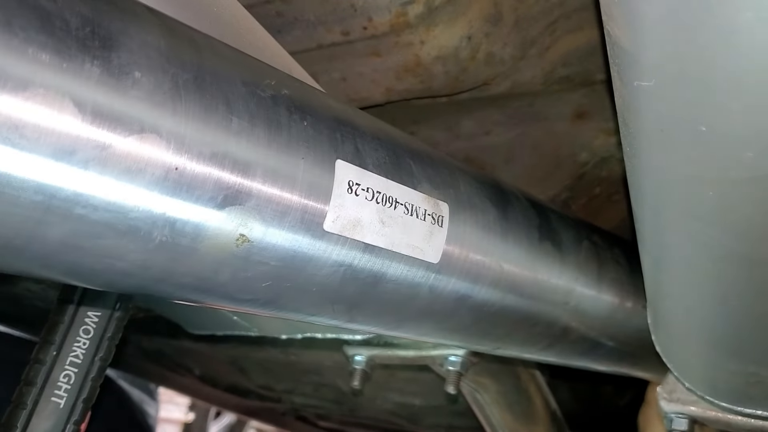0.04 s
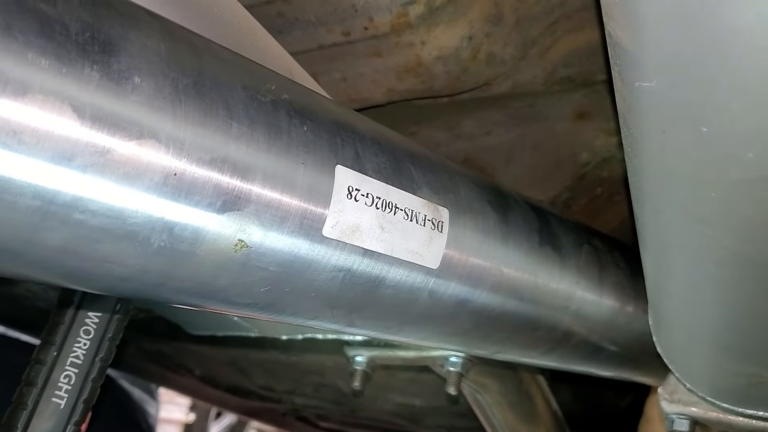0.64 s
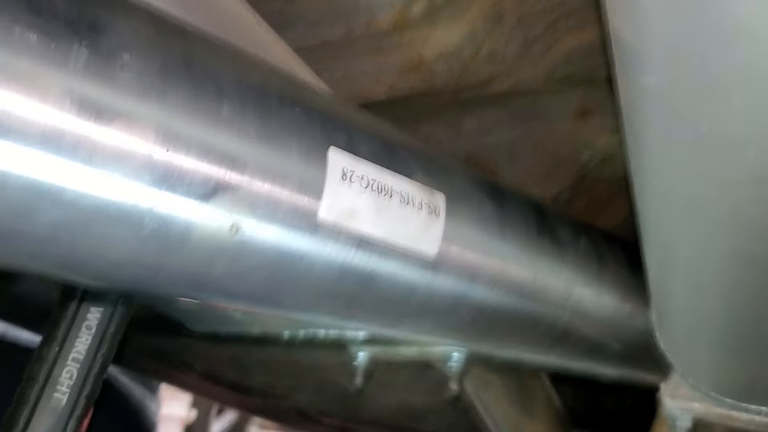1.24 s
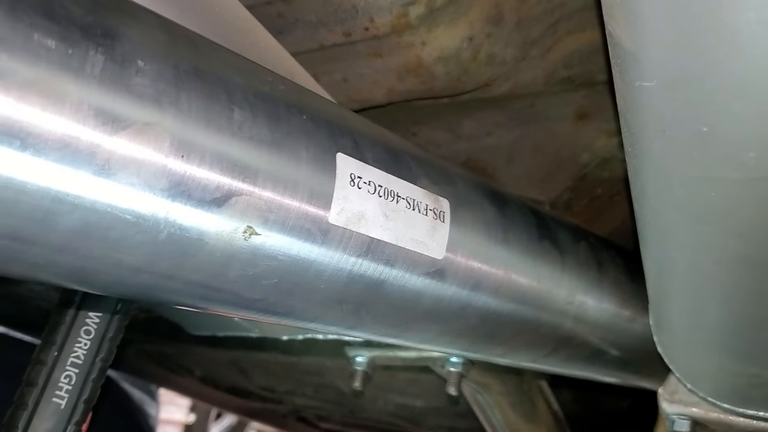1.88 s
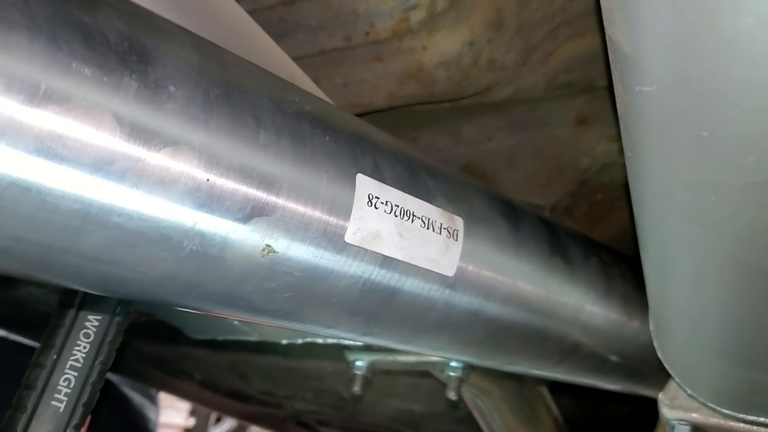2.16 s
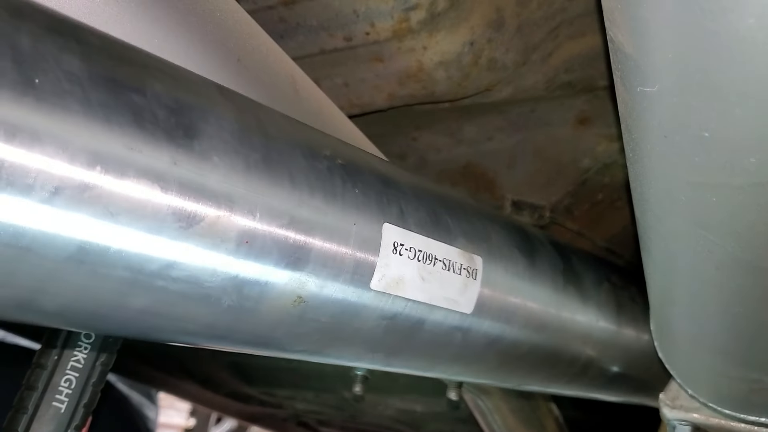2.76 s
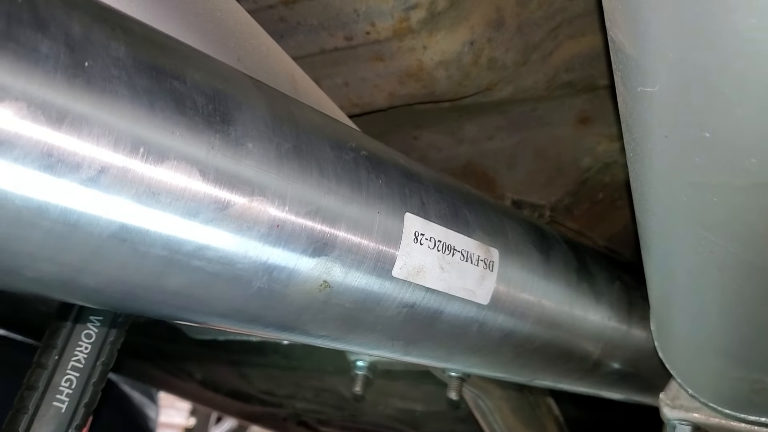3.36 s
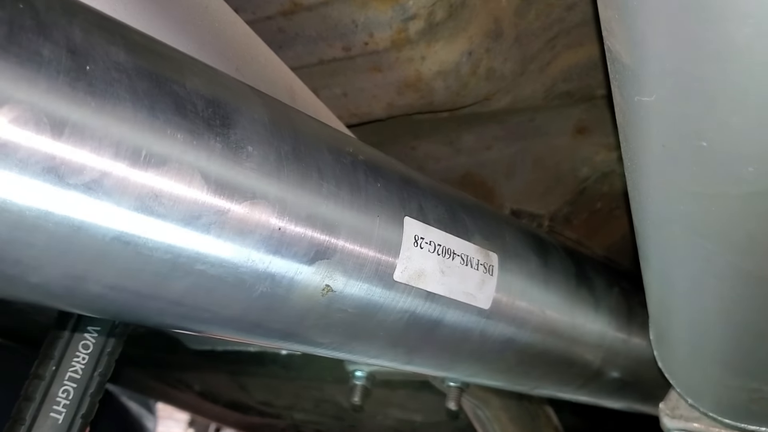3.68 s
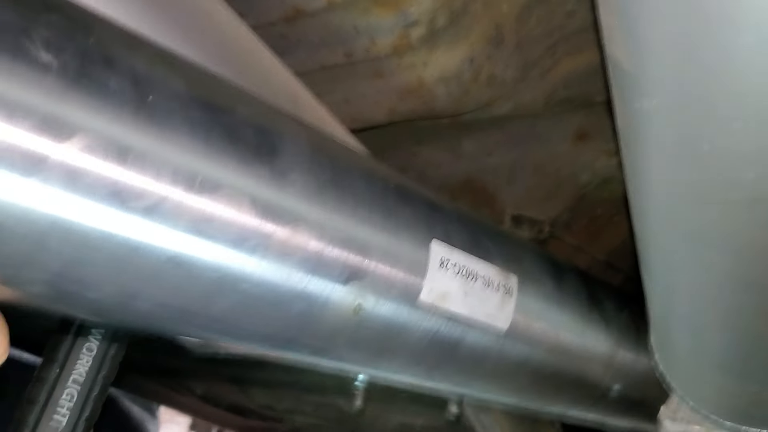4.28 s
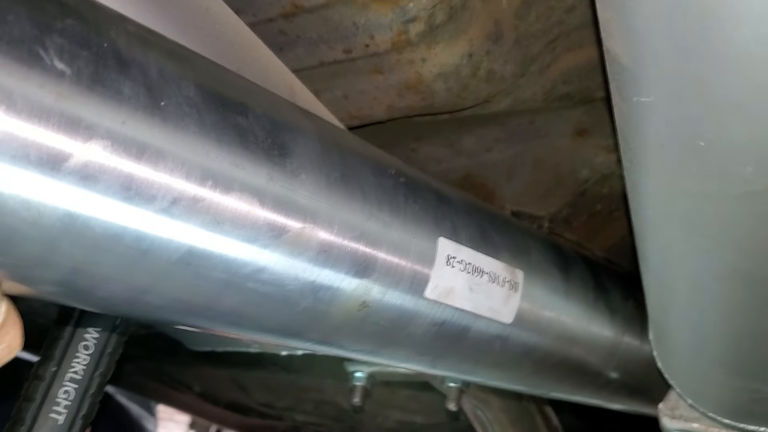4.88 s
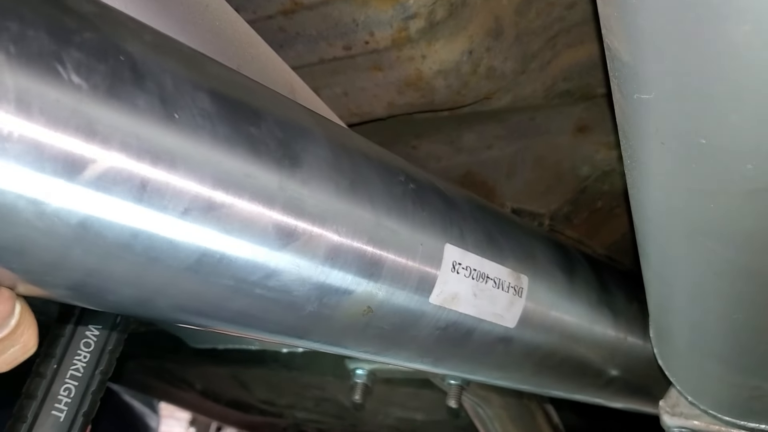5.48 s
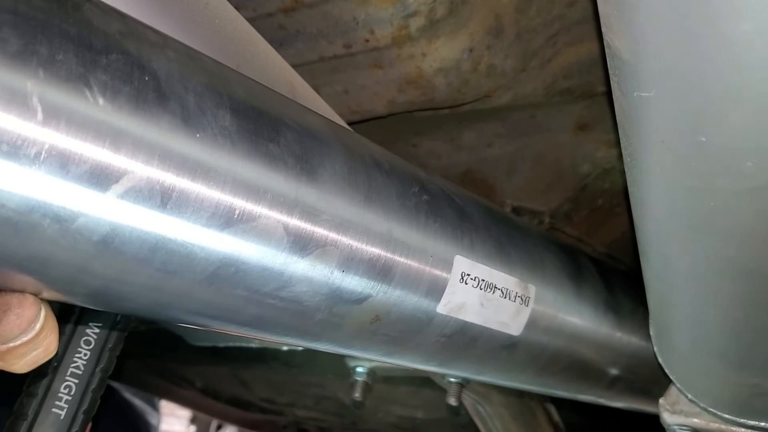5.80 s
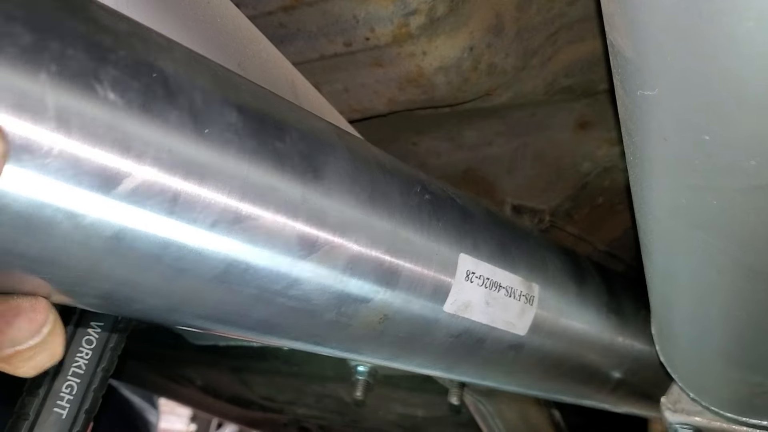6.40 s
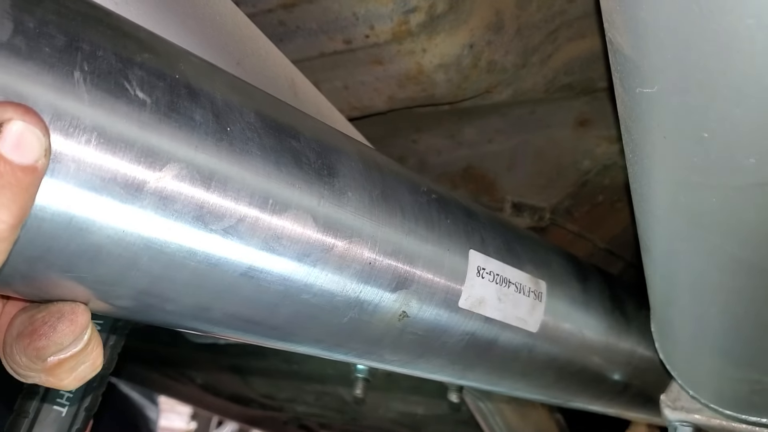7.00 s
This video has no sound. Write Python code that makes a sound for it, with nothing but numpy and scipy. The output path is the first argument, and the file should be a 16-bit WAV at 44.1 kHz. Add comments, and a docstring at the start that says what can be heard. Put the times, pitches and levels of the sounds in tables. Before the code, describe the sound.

Close up under a car in a garage, a hand brushes along a metal driveshaft and turns it back and forth. Dry joints scrape softly, a loose metal part clanks twice, and slack gears close in irregular clunks that briefly ring the tube. A quick cluster of knocks leads to a deep thud from the car body, then a few more clunks and a short squeak. A low hum continues underneath.

```python
"""A low hum in a garage, then a hand brushing along a metal driveshaft and the scrape of its dry joints.
We are under a car, a two-port microphone close to the shaft, while the hand turns it to and fro.
The slack in the gears closes with clunks that shake the underbody and ring the tube.
A loose metal part clanks twice, and three shoves set the car body thudding."""
import sys
import numpy as np
from scipy import signal
from scipy.fft import rfft, irfft
from scipy.io import wavfile

SR = 44100
rng = np.random.default_rng(int(sys.argv[2]) if len(sys.argv) > 2 else 0)


def put_to_file(sound):
    """Save the sound as 16-bit audio at rate SR, in the file named by the first command-line argument."""
    columns = np.atleast_2d(sound).T  # one column per channel
    safe = np.clip(columns, -1, 1)
    whole_steps = np.round(safe * 32767)
    wavfile.write(sys.argv[1], SR, whole_steps.astype(np.int16))


N = 314918


def amp(db):
    """Decibels to gain."""
    return 10 ** (np.asarray(db) / 20)


def unit(x):
    """Scales to rms 1."""
    return x / np.sqrt(np.mean(x ** 2) + 1e-20)


def read(points, hz):
    """Reads a table on a log-frequency axis."""
    f, value = np.transpose(points)
    return np.interp(np.log(hz + 1), np.log(f + 1), value)


def bins(size):
    """Frequencies of a spectrum in Hz."""
    return np.fft.rfftfreq(size, 1 / SR)


def add(mix, s, sound):
    """Mixes a sound in at s seconds."""
    part = mix[:, max(round(s * SR), 0):][:, :sound.shape[1]]
    part += sound[:, :part.shape[1]]


def drift(rate_hz):
    """A smooth random wander of rms 1."""
    return unit(irfft(rfft(rng.standard_normal(N)) * np.exp(-(bins(N) / rate_hz) ** 2), N))


# How alike the two ports hear a noise. Each row: frequency in Hz, correlation.
PORT_LIKENESS = [(60, 1), (300, 0.98), (1000, 0.27), (4000, 0.2), (9000, 0.063), (15000, 0.15)]
def noise(tone_db, size):
    """Coloured noise, partly alike at the two ports."""
    left, other = rfft(rng.standard_normal((2, size)))
    same = np.clip(read(PORT_LIKENESS, bins(size)), 0, 1)
    right = same * left + np.sqrt(1 - same ** 2) * other
    return unit(irfft(np.array([left, right]) * amp(tone_db), size))


# Room tone of the still garage. Each row: frequency in Hz, relative level in dB.
ROOM_TONE = [(20, -18), (40, -7), (62, 0), (100, -3), (160, -18), (340, -22), (500, -31), (1200, -37),
             (2400, -44), (4000, -49), (6800, -53), (7800, -60), (16000, -54)]
# The hum in the room. Each row: frequency in Hz, level in dB about which it wavers.
HUM_TONES = [(58.5, -62.5), (86, -54), (115, -58.5)]
def background(waver_db=3.5, wander_rad=0.37, air_db=-52):
    """Low rumble and a wavering hum fill the garage."""
    t, hum = np.arange(N) / SR, 0
    for hz, db in HUM_TONES:
        peak = amp(db + waver_db * drift(12.0)) * np.sqrt(2)
        hum += peak * np.sin(2 * np.pi * hz * t + wander_rad * drift(6.6))
    return hum + amp(air_db) * noise(read(ROOM_TONE, bins(N)), N)


def strokes(rows, rest_db, drop_db=27, roundness=1.39):
    """Gain of rubbing: a stroke is drop_db down one swell before and one ebb after its fastest moment."""
    t, power = np.arange(N) / SR, amp(rest_db) ** 2
    for s, swell_s, ebb_s, db in rows:
        away = np.maximum((s - t) / swell_s, (t - s) / ebb_s)
        power = power + amp(db - drop_db * np.minimum(away, 10) ** roundness) ** 2
    return np.sqrt(power)


def humps(peaks):
    """Resonance peaks in dB over frequency."""
    return sum(db / (1 + (2 * (bins(N) - hz) / width) ** 2) for hz, width, db in peaks)


# The hiss of the hand, close up. Each row: frequency in Hz, relative level in dB.
HAND_TONE = [(500, 4.5), (1500, -0.5), (3300, 7), (6500, 1), (7600, -9), (9500, -5.5), (12000, -1),
             (15000, 1.5), (16000, -8.5)]
# The tube's resonances under the hand. Each row: centre in Hz, width in Hz, gain in dB.
HAND_PEAKS = [(596, 60, -8.5), (1346, 52, 13), (2978, 130, 8.5), (3360, 27, 7), (5470, 74, -7),
              (5720, 57, 13.5), (6400, 47, 0.5), (6770, 57, 8.5), (8820, 64, 9), (9540, 230, 5.5),
              (9400, 100, 1)]
# Slides of the hand. Each row: fastest moment, swell and ebb in seconds, relative level in dB.
HAND_SLIDES = [(.59, 0.11, 0.13, -61), (.7, 0.096, 0.082, -61.5), (.815, .13, 0.084, -46.5),
               (.96, 0.1, 0.12, -64.5), (1.095, 0.07, 0.13, -55), (1.22, 0.048, 0.13, -65.5),
               (1.445, 0.21, 0.78, -65.5), (1.78, 0.061, 0.06, -64), (2.16, 0.39, .13, -60.5),
               (2.66, 0.078, 0.11, -65.5), (2.78, 0.25, 0.1, -53.5), (3.01, 0.22, 0.15, -58.5),
               (3.29, 0.23, .15, -66), (3.4, 0.36, 0.11, -65), (3.62, 0.3, 0.19, -67),
               (4.29, 0.12, 0.24, -51.5), (4.51, 0.18, 0.13, -58.5), (4.58, 0.11, .15, -60.5),
               (4.69, 0.12, .16, -57), (4.93, 0.077, 0.15, -62), (5.18, 0.11, 0.11, -62.5),
               (5.31, 0.078, 0.11, -62.5), (5.465, 0.04, .09, -65), (5.62, 0.42, 0.22, -64),
               (5.755, .05, 0.081, -67), (5.85, .09, 0.17, -63), (6.26, 0.3, 0.055, -60),
               (6.38, 0.25, 0.1, -53.5), (6.57, 0.26, 0.099, -53), (7.13, 0.18, .1, -61.5)]
def brush(rough_db=1.2, gain_db=4.5):
    """Skin and sleeve slide with a fine, slightly grainy hiss, coloured by the tube."""
    hiss = noise(read(HAND_TONE, bins(N)) + humps(HAND_PEAKS), N)
    return amp(gain_db + rough_db * drift(170)) * strokes(HAND_SLIDES, rest_db=-88.5) * hiss


# Friction in the dry joints. Each row: frequency in Hz, relative level in dB.
JOINT_TONE = [(30, -20), (55, 3), (85, 10.5), (140, -6), (300, -7.5), (460, -3), (680, -9), (950, -12),
              (1560, -13), (1950, -21), (3300, -19.5), (6500, -36.5), (8000, -56.5), (16000, -59.5)]
# The resonances it drives. Each row: centre in Hz, width in Hz, gain in dB.
JOINT_PEAKS = [(480, 48, -3.5), (686, 100, -0.5), (975, 8.1, 18), (1310, 17, 9.5), (1520, 61, 6),
               (1690, 69, 8.5), (2080, 210, 5.5), (2550, 17, 3.5), (3170, 230, 5), (3890, 90, 11.5),
               (5500, 250, 7)]
# Turns of the joints. Each row: fastest moment, swell and ebb in seconds, relative level in dB.
JOINT_TURNS = [(.64, 0.042, 0.074, -64), (.835, 0.073, 0.17, -49.5), (2.0, 0.24, 0.093, -43),
               (2.18, 0.053, 0.088, -45), (2.73, 0.11, 0.054, -35), (2.795, 0.066, 0.094, -33.5),
               (3.0, 0.16, 0.18, -47.5), (3.445, 0.13, 0.091, -49), (3.97, 0.027, 0.04, -59),
               (4.27, .08, 0.056, -41.5), (4.49, 0.3, 0.18, -47.5), (4.7, 0.099, 0.38, -47),
               (4.95, 0.063, 0.054, -28.5), (5.58, 0.1, 0.23, -51.5), (6.55, 0.15, 0.18, -45.5)]
# The tube sings as it binds. Each row: time in seconds, level in dB.
BINDING = [(6.46, -79), (6.5, -61), (6.56, -34), (6.6, -50), (6.64, -104.5)]
def scrapes(rough_db=1.5, gain_db=3.7, creep_db=-75, sing_hz=1680, sing_width_hz=22):
    """Uneven friction in the joints drives the tube's resonances, creeping faintly between turns."""
    t, hz = np.arange(N) / SR, bins(N)
    grain = unit(amp(rough_db * drift(150)))
    friction = noise(read(JOINT_TONE, hz) + humps(JOINT_PEAKS), N)
    rub = friction * grain * strokes(JOINT_TURNS, rest_db=creep_db)
    song = noise(-20 * np.log10(1 + ((hz - sing_hz) / sing_width_hz) ** 2), N)
    song_db = np.interp(t, *np.transpose(BINDING), left=-140, right=-140)
    return amp(gain_db) * rub + amp(song_db) * song


def fade(x, t60s):
    """Lets each frequency die at its own speed."""
    hz, t, spectra = signal.stft(x, SR, nperseg=256)
    decay = amp(-60 * t / read(t60s, hz)[:, None])
    return signal.istft(spectra * decay, SR, nperseg=256)[1][:, :x.shape[1]]


def ring(modes, t, spread=0.7, scatter=0.84):
    """Decaying sines; their phases vary with each blow and, in high modes, between the ports."""
    hz, db, t60 = np.transpose(modes)[:, :, None]
    phase = scatter * rng.standard_normal(hz.shape) + np.pi * np.arange(len(hz))[:, None]
    phase = phase + spread * np.minimum(hz / 1000, 1) * rng.standard_normal((2, len(hz), 1))
    return (amp(db - 60 * t / t60) * np.sin(2 * np.pi * hz * t + phase)).sum(1)


def causal(gain_db, size=4096):
    """Minimum-phase impulse response: resonances ring after a sound, never before it."""
    half = len(gain_db) - 1
    folded = irfft(np.log(amp(gain_db))) * np.r_[1, np.full(half - 1, 2), np.zeros(half)]
    return irfft(np.exp(rfft(folded)))[None, :size]


def dying(t):
    """Brings the last third of a ring smoothly to rest."""
    return np.clip(3 * (1 - t / t[-1]), 0, 1) ** 2


def strength(bands):
    """Rms of each band over the first 45 ms."""
    return np.sqrt(np.mean(bands[..., :2000] ** 2, axis=(-2, -1), keepdims=True)) + 1e-9


# The borders between the five zones of a blow, in Hz.
BORDERS_HZ = [130, 600, 2000, 5000]
def zones(x):
    """Splits a sound, low to high, into boom, body, clunk, ring and tick."""
    below = [1 / (1 + (bins(x.shape[1]) / hz) ** 10) for hz in BORDERS_HZ]
    shares = np.diff(below, axis=0, prepend=0, append=1)
    return irfft(rfft(x) * shares[:, None], x.shape[1])


# How the crowd of short modes in struck metal dies. Each row: frequency in Hz, t60 in seconds.
CROWD_DECAY = [(60, 0.7), (200, 0.26), (320, 0.089), (500, 0.023), (1500, 0.16), (3500, 0.15), (8000, 0.16),
               (15000, 0.05)]
def blow(tone, modes, zone_db, t, damping, crowd_db, jolt_db, punch, contact_s):
    """Metal hits metal: a direct jolt, crowded short modes and clear ones, levelled zone by zone."""
    land_s, peak_s = 0.003, 0.0035
    rise_s = np.array([0.0027, 0.00071, 0.0035, 0.0015, 0.00051])[:, None, None]  # boom to tick
    tone_db = read(tone, bins(len(t)))
    crowd = zones(fade(noise(tone_db, len(t)), CROWD_DECAY))
    jolt = zones(np.roll(causal(tone_db, size=len(t)), round(land_s * SR)))
    contact = 1 + punch * np.exp(-((t - peak_s) / contact_s) ** 2)  # loudest while the parts press
    bands = amp(crowd_db) * crowd / strength(crowd) + zones(modes)
    bands[:-1] += amp(jolt_db) * (jolt / strength(jolt))[:-1]  # the tick is all rattle
    bands *= 1 - np.exp(-(t / rise_s) ** 2)
    bands[1:] *= contact * damping  # the heavy car body booms on undamped
    return (bands / strength(bands) * amp(zone_db)[:, None, None]).sum(0) * dying(t)


# The metal around the microphone. Each row: frequency in Hz, relative level in dB, t60 in seconds.
UNDERBODY_MODES = [(52.2, -2, 0.5), (85.8, 4, 0.39), (310, -14, 0.15), (459, -2, 0.17), (637, -16, 0.16),
                   (692, -1.5, 0.08), (1070, -5.5, 0.2), (1190, -9, 0.14), (1280, -12, 0.15),
                   (1418, -7, 0.22), (1530, -11, 0.16), (2126, -14, 0.12), (2912, -7, .2), (3080, -7, 0.2),
                   (3220, -10, .13), (4200, -25, 0.12), (5360, -29, .14)]
BENDING_MODES = [(357.8, 0.0079, 0.48)]
TUBE_MODES = [(1416, -14, .12), (1663, -5.5, .14), (1739, -16, .12), (3085, -15, .14), (3235, -21, .11),
              (3970, -25, .14), (4335, -34, .12)]
SHIELD_MODES = [(1124, -11, .65), (1160, -21, 0.67), (1157, -12.5, 0.5), (1350, -13.5, 0.28)]  # thin sheet metal, ringing on after hard blows
FLOOR_PAN_MODES = [(263, -33, .35), (393, -34, .33), (517, -28, .55), (617, -36, .45), (947, -42, .42),
                   (1534, -38, .35)]
# The axle's crowd of short modes. Each row: frequency in Hz, relative level in dB.
AXLE_TONE = [(30, -25.5), (55, -7.5), (125, -11.5), (220, -2.5), (310, 9), (410, -9), (480, -2), (720, 4.5),
             (900, -6.5), (1150, -3.5), (1700, -16), (1950, -16.5), (3100, 1), (6500, -34), (7800, -48),
             (16000, -47)]
# Body, clunk, ring and tick of a knock. Each row: octaves above the body, gain in dB before dulling.
KNOCK_COLOUR = [(0, -0.5), (1.998, 8.5), (3.5, 6), (4.498, 1.5)]
# The gear slack closing. Each row: start in seconds, force in dB, dullness in dB per octave,
# then levels in dB of the car body's boom, the shaft's bending tone and the tube's ring.
GEAR_KNOCKS = [(1.272, -36.5, 2.3, -22.5, -26, -58), (1.412, -41, 6.8, -32.5, -51, -64),
               (1.59, -31, 10, -32.5, -48, -73), (2.032, -23, 5.5, -24, -19.5, -38),
               (2.099, -27, 9.5, -34, -37.5, -56), (3.013, -37.5, 9, -27.5, -51, -48),
               (3.503, -21.5, 5.5, -23.5, -18, -16), (3.584, -41.5, 6, -38, -51.5, -50),
               (4.27, -23.5, 3.5, -39.5, -21, -16), (4.301, -24.5, 8, -26, -47.5, -56),
               (4.342, -29.5, 8.5, -56.5, -35.5, -31), (4.405, -40, 6, -35, -45.5, -68),
               (4.425, -33, 8, -39, -40.5, -66), (4.668, -43.5, 5, -44.5, -45, -44),
               (4.735, -35, 9.5, -31, -39, -57), (4.912, -28, 7, -21.5, -38, -33),
               (4.927, -29.5, 5.5, -34, -51.5, -18.5), (4.951, -31.5, 6.5, -39.5, -28, -26),
               (6.109, -30.5, 9.5, -35.5, -35, -41), (6.565, -22.5, 10, -26, -32.5, -29.5),
               (6.601, -36.5, 7.5, -25.5, -40.5, -63), (7.025, -44.5, 13, -27, -55.5, -71)]
def knocks(swell_s=0.0005, detune=0.008, free_s=0.037, seated_t60=0.035, seated_share=0.5):
    """The gear teeth collide; the shaft bends freely until they seat and damp it."""
    out, t = np.zeros((2, N)), np.arange(32768) / SR
    free = amp(-60 * np.maximum(t - free_s, 0) / seated_t60)
    damping = seated_share + (1 - seated_share) * free
    swell = (1 - np.exp(-t / swell_s)) * dying(t)
    octaves, colour_db = np.transpose(KNOCK_COLOUR)
    for s, force_db, dullness, boom_db, bend_db, wall_db in GEAR_KNOCKS:
        zone_db = np.r_[boom_db, force_db + colour_db - dullness * octaves]  # soft contact loses treble
        ring_db = zone_db[-2]
        tuning = 1 + detune * rng.standard_normal()  # the load on the joints shifts the modes a little
        clunk = blow(AXLE_TONE, ring(UNDERBODY_MODES, t * tuning), zone_db, t, damping,
                     crowd_db=-2.5, jolt_db=-8.5, punch=0.98, contact_s=0.003)
        bending = amp(bend_db) * free * ring(BENDING_MODES, t)
        tube = amp(wall_db) * ring(TUBE_MODES, t * tuning)
        shield = amp(ring_db) * ring(SHIELD_MODES, t)
        floor_pan = amp(boom_db) * ring(FLOOR_PAN_MODES, t * tuning)
        add(out, s, clunk + 2 * swell * (bending + tube + shield + floor_pan))
    return out


# The loose part's clear modes. Each row: frequency in Hz, relative level in dB, t60 in seconds.
LOOSE_MODES = [(456, -6, .35), (815, 4, .1), (947, -11, .25), (1287, -4, .17), (1534, -12, .35),
               (1732, -1, .16), (2130, -2, .17), (2510, -2, .15), (3063, -4, .14), (3287, -2, .14),
               (3397, -5, .13), (3644, -10, .14), (5243, -18, .24), (5631, -14, .1)]
# Its crowd of short modes. Each row: frequency in Hz, relative level in dB.
LOOSE_TONE = [(40, -7), (200, -18.5), (450, 0), (640, -1.5), (820, 4.5), (1100, -3), (3300, -9.5),
              (5500, -17.5), (7000, -30.5), (7800, -38.5), (16000, -40)]
# Its strikes. Each row: start in seconds, then boom, body, clunk, ring and tick in dB.
LOOSE_STRIKES = [(1.792, -31, -31, -25, -24, -40), (1.935, -39, -40.5, -36.5, -47, -88)]
def clanks():
    """A loose metal part strikes and rings brightly."""
    out, t = np.zeros((2, N)), np.arange(32768) / SR
    for s, *zone_db in LOOSE_STRIKES:
        clank = blow(LOOSE_TONE, ring(LOOSE_MODES, t), zone_db, t, damping=1,
                     crowd_db=-5, jolt_db=-21.5, punch=0.6, contact_s=0.01)
        add(out, s, clank)
    return out


# Pushes that shake the car overhead. Each row: start in seconds, level in dB.
PUSHES = [(3.015, -41.5), (4.913, -9), (6.108, -37)]
def shoves(body_hz=52, build_s=0.0049, t60=0.35, floor_pan_db=2):
    """A hard push on the shaft swings the car body with a deep thud, and the floor pan rings on."""
    out, t = np.zeros((2, N)), np.arange(32768) / SR
    thud = amp(-60 * t / t60) * np.sin(2 * np.pi * body_hz * t)
    swell = (1 - np.exp(-(t / build_s) ** 2)) * dying(t)
    for s, db in PUSHES:
        add(out, s, amp(db) * swell * (thud + amp(floor_pan_db) * ring(FLOOR_PAN_MODES, t)))
    return out


def tube_wall(x, spacing_hz=70, ripple_db=6.0):
    """The thin wall's crowded resonances put a random ripple on the spectrum."""
    hz, knots = bins(N), np.arange(0, SR / 2, spacing_hz)
    ripple = np.interp(hz, knots, rng.standard_normal(1200)[:len(knots)]) - 0.3
    depth = read([(900, 0.42), (2500, 0.72), (8000, 0.44), (15000, 1.0)], hz)
    return signal.oaconvolve(x, causal(ripple_db * depth * ripple), axes=1)[:, :N]


# The garage, heard from under the car. Each row: frequency in Hz, t60 in seconds.
GARAGE_DECAY = [(80, 1), (300, 0.3), (1100, 0.39), (3000, 0.3), (10000, 0.26)]
def garage(x, build_s=0.017):
    """A diffuse tail builds up under the car, different at each port."""
    t = np.arange(SR) / SR
    tail = fade(rng.standard_normal((2, SR)), GARAGE_DECAY) * (1 - np.exp(-t / build_s))
    return signal.fftconvolve(x, tail / np.linalg.norm(tail[0]), axes=1)[:, :N]


# The lag at the microphone's right port. Each row: frequency in Hz, phase in radians.
RIGHT_LAG = [(60, 0.15), (140, 0.51), (350, 0.33), (540, 0.81), (680, 0.23), (850, 2), (1400, 2.22),
             (1670, 4.8), (2700, 4.4), (3100, 4.1), (4000, 10.5), (5000, 9.6), (16000, 48)]
def from_left(x):
    """The sound reaches the right port a little later, by a path that bends round the tube."""
    lag = np.exp(-1j * read(RIGHT_LAG, bins(N)))
    return np.array([x[0], irfft(rfft(x[1]) * lag, N)])


def scene(room_db=-17):
    """Metal and hand sound close by through the tube wall, with the garage and its hum behind."""
    ends = signal.windows.tukey(N, 0.001)
    metal = from_left(ends * (knocks() + shoves() + clanks() + scrapes()))
    near = tube_wall(metal + brush())
    return ends * (near + amp(room_db) * garage(near) + from_left(background()))


# The colour of the two ports. Each row: frequency in Hz, left over right in dB.
PORT_BALANCE = [(80, -1.5), (140, 2.5), (300, 0), (520, -4), (800, 0.5), (1200, -2.5), (1750, -0.5),
                (2700, -2.5), (4200, 0.5), (6400, -9.5), (9500, -9.5), (15000, -4.5)]
def record(dry, low_cut_hz=36, high_cut_hz=15850):
    """The microphone: each port has its own colour and loses the deepest bass and highest treble."""
    tilt_db = read(PORT_BALANCE, bins(N)) * np.array([[0.5], [-0.5]])
    coloured = irfft(rfft(dry) * amp(tilt_db), N)
    low_cut = signal.butter(4, low_cut_hz, "high", fs=SR, output="sos")
    high_cut = signal.firwin(511, high_cut_hz, window=("kaiser", 9), fs=SR)
    return signal.oaconvolve(signal.sosfilt(low_cut, coloured), high_cut[None], "same")


dry = scene()
out = record(dry)
put_to_file(out)
```